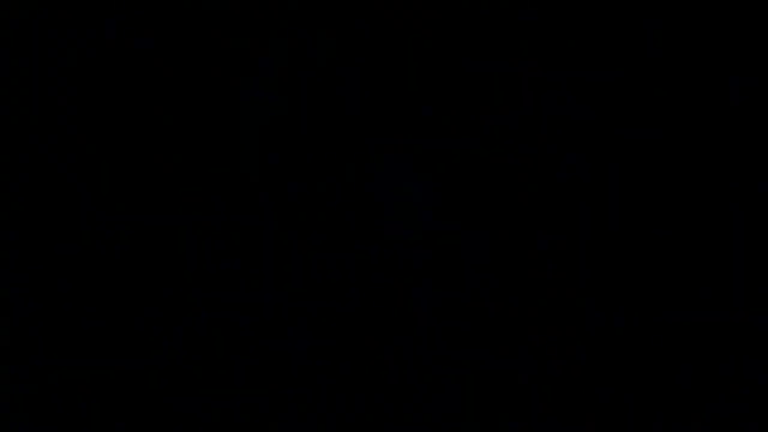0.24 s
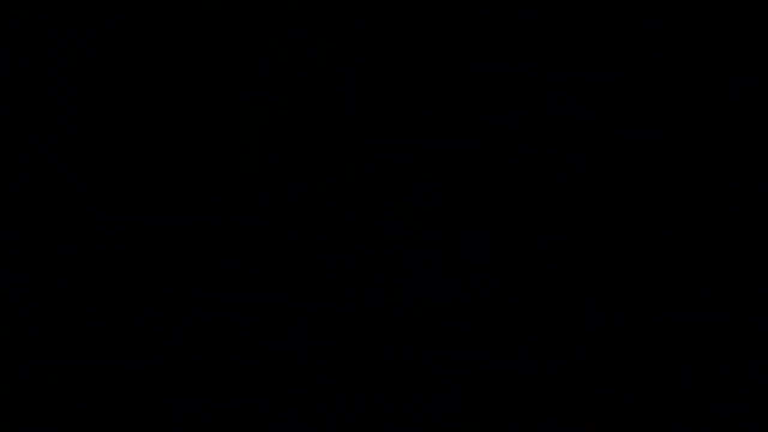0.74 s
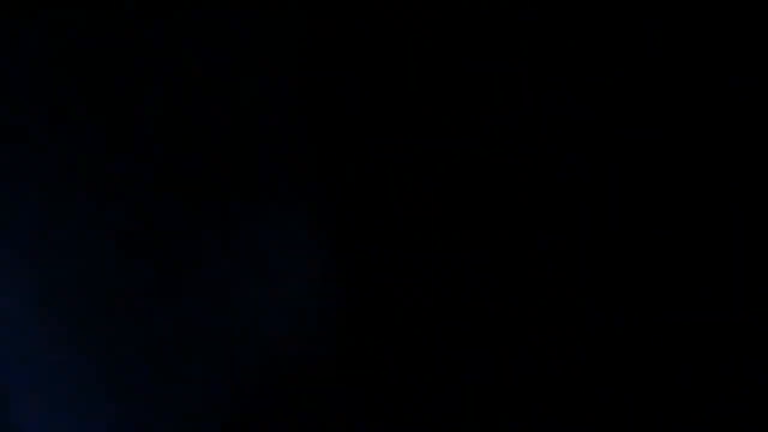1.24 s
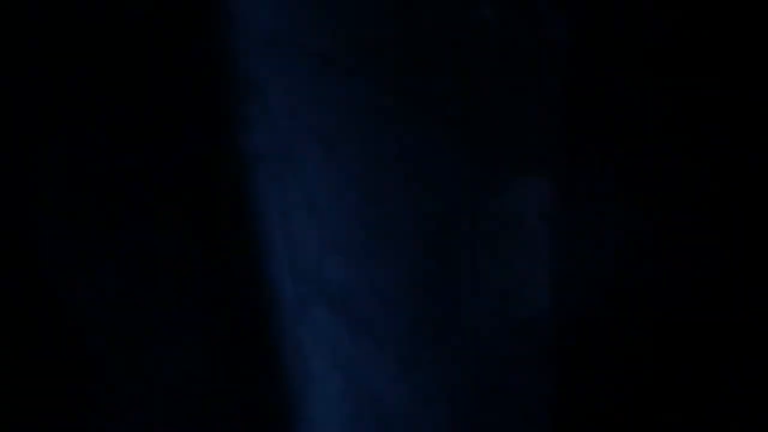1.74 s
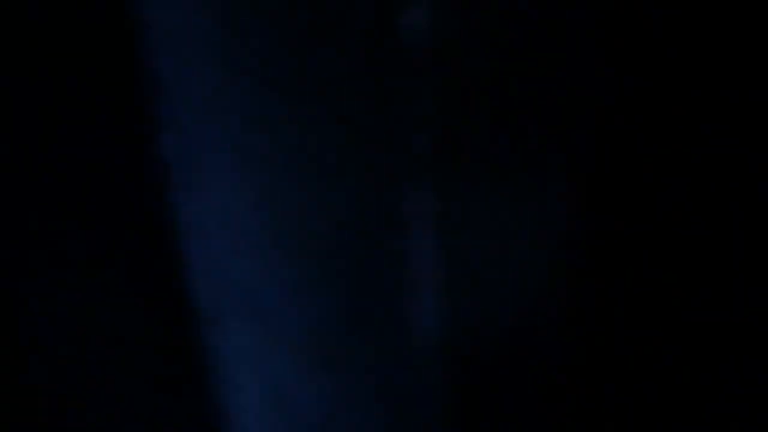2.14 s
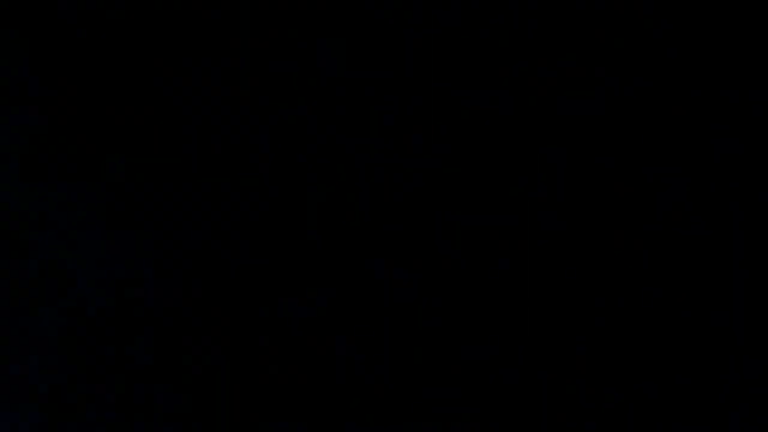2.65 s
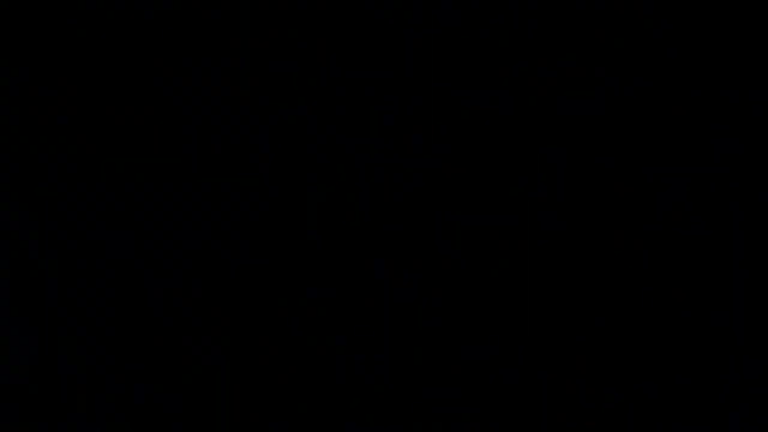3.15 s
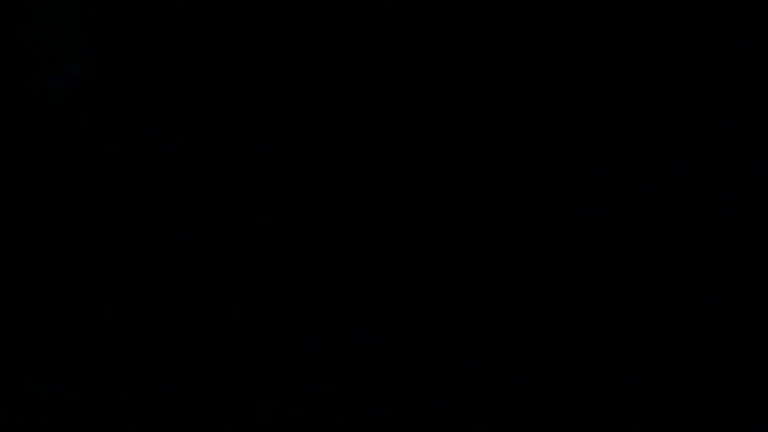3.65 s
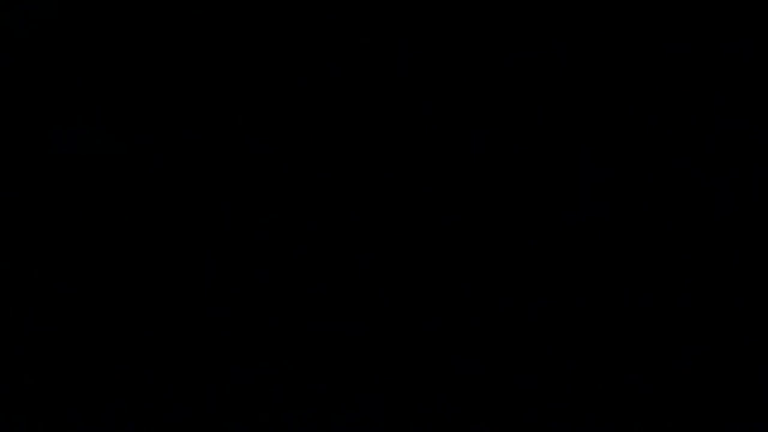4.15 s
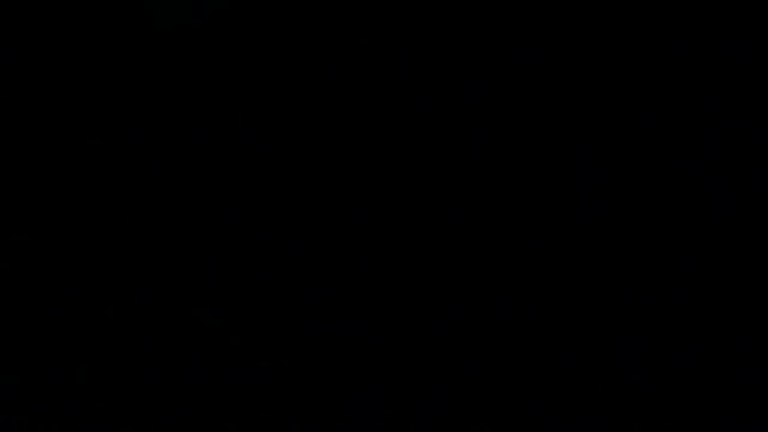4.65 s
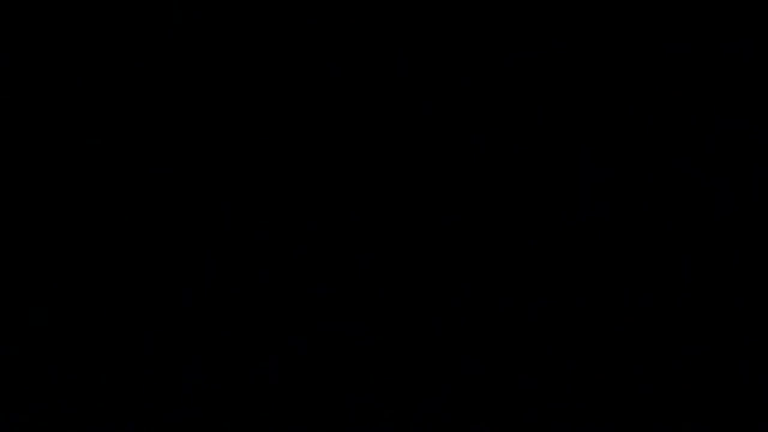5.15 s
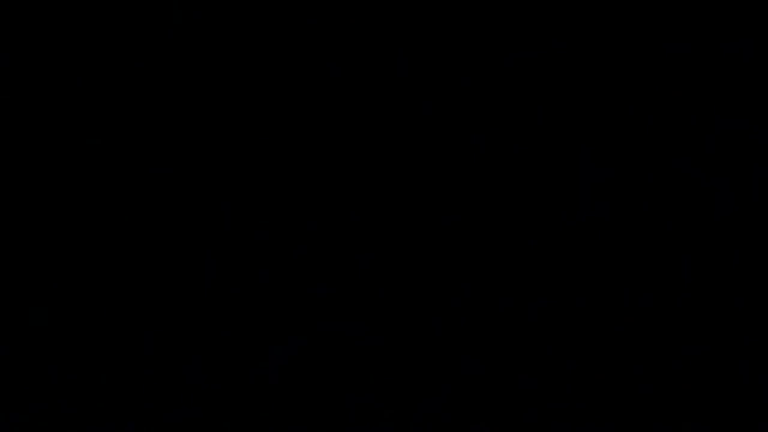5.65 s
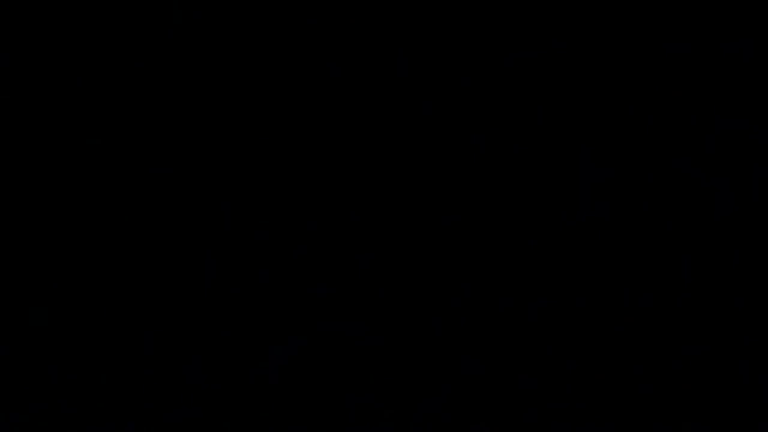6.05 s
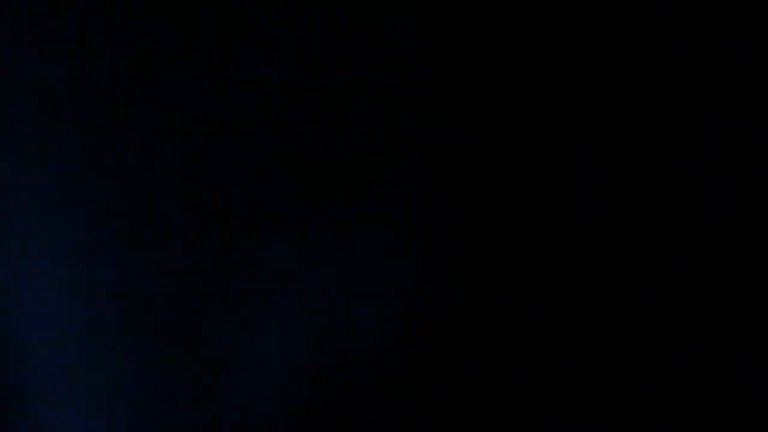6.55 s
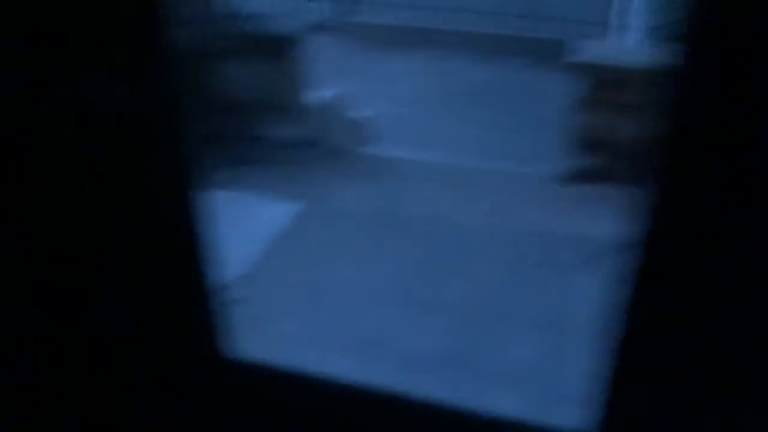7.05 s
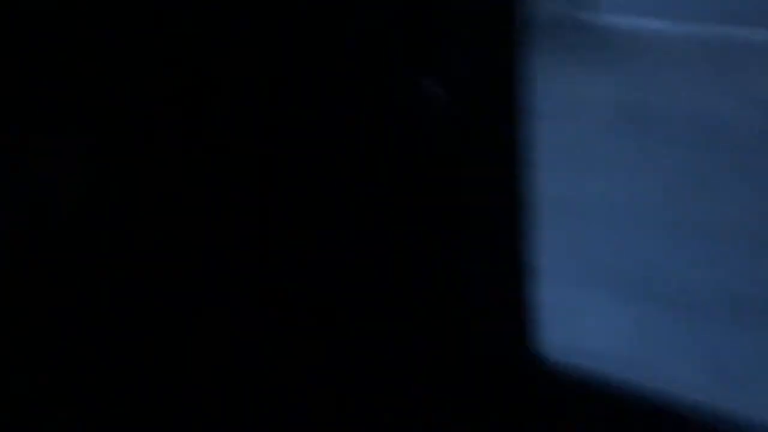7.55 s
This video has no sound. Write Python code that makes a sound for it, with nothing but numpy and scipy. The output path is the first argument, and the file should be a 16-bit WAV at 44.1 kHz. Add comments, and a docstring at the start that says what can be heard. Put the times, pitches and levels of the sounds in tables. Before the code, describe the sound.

Door and lock knocks in an echoing hall, then a bunch of metal keys jingles and clinks close by, with hard clacks and handling bumps.

```python
"""Keys and a door in an echoing hall

A bunch of keys is shaken and sorted in a hard entrance hall while a door is unlocked and opened.
Keys are ticks of noise and decaying modes; door and lock are struck, scraped and ringing resonances.
Sleeves rustle as uneven noise, bare walls answer, and a quiet background with a wavering hum runs throughout.
Near the end, fingers bump the microphone's housing as quick falling tones."""
import sys
import numpy as np
from scipy import signal
from scipy.fft import rfft, irfft
from scipy.io import wavfile
from scipy.ndimage import uniform_filter1d

SR = 44100
rng = np.random.default_rng(int(sys.argv[2]) if len(sys.argv) > 2 else 0)


def to_wav(sig):
    """Store sig (one row per channel, or 1-D mono) as 16-bit WAV at the path in sys.argv[1].

    Samples outside -1..1 are clipped; the rate is SR.
    """
    pcm = np.clip(np.atleast_2d(sig), -1, 1) * 32767
    pcm = np.round(pcm).astype(np.int16)
    wavfile.write(sys.argv[1], SR, pcm.T)  # frames by channels


N = 343980
TOP_HZ = 15850  # upper limit of the recorder
ORDINARY_DB = -30  # an ordinary strike or shake of the keys

# spectrum of cloth and skin: (pitch_hz [Hz], level_db [dB])
CLOTH_COLOUR = [(30, -5.5), (60, -3), (140, -3), (300, 3.5), (700, 0.5), (1500, -5), (2600, -7.5),
                (4500, -17.5), (9000, -22), (16000, -24)]


def undb(db):
    """Decibels to gain."""
    return 10 ** (np.asarray(db) / 20)


def seconds(length):
    """Time axis of a short sound."""
    return np.arange(int(length * SR)) / SR


def add(track, start, sound):
    """Mix a sound into a track at a time in seconds."""
    i = int(np.clip(start * SR, 0, len(track)))
    track[i:i + len(sound)] += sound[:len(track) - i]


def unit(x):
    """Scale to rms 1."""
    return x / np.sqrt(np.mean(x ** 2))


def crest(x):
    """Scale so that the loudest 5 ms have rms 1."""
    return x / np.sqrt(uniform_filter1d(x ** 2, size=220, mode="constant").max())


def along(hz, points):
    """Read (Hz, value) points on a log-frequency axis."""
    f, value = np.transpose(points)
    return np.interp(np.log(np.maximum(hz, 1)), np.log(f), value)


def colour(x, points):
    """Give a sound the spectrum of (Hz, dB) points."""
    gain = undb(along(np.fft.rfftfreq(len(x), 1 / SR), points))
    return irfft(rfft(x) * gain, len(x))


def band(x, lo, hi):
    """Causal band-pass."""
    return signal.sosfilt(signal.butter(2, [lo, hi], "bandpass", fs=SR, output="sos"), x)


def air(waver_hz=7, waver=1.0):
    """Quiet background noise, with low hum tones whose strength wavers at random."""
    # spectrum of the background: (pitch_hz [Hz], level_db [dB, relative])
    air_colour = [(15, -41), (25, -4), (123, -2.5), (190, -4), (363, -5), (887, -15), (1020, -15.5),
                  (1520, -18.5), (3820, -17), (7920, -23.5), (10400, -20), (16000, -29.5)]
    # hum tones: (pitch_hz [Hz], level_db [dB, mean amplitude])
    hum = [(119, -65), (242.2, -71), (333.8, -74)]
    air_db = -62.5  # rms
    out = undb(air_db) * unit(colour(rng.standard_normal(N), air_colour))
    slow = signal.butter(2, waver_hz, fs=SR, output="sos")
    for hz, db in hum:
        drift = unit(signal.sosfilt(slow, rng.standard_normal(N)))
        tone = np.sin(2 * np.pi * hz * np.arange(N) / SR)
        out = out + undb(db) * (1 + waver * drift) * tone
    return out


def friction(length, grain_db, grain_s):
    """Noise of two surfaces that catch and slip unevenly."""
    grip, noise = rng.standard_normal((2, max(length, SR)))
    grip = unit(uniform_filter1d(grip, max(int(grain_s * SR), 1)))
    return (noise * undb(grain_db * grip))[:length]


def scrapes(spread=2.49):
    """Short strokes of friction that swell and fade."""
    # scrapes and rubs of key, door, sleeves and hand:
    # (start_s [s], end_s [s], level_db [dB rms before the swell], centre_hz [Hz])
    strokes = [(0.0, 0.143, -59, 543), (0.513, 0.56, -41.5, 1170), (0.842, 1.006, -47, 229),
               (2.577, 2.757, -51.5, 6100), (3.323, 3.495, -58, 3680), (6.41, 6.502, -40.5, 230),
               (4.269, 4.558, -48.5, 61.6), (4.768, 4.838, -37, 1700), (4.807, 4.887, -38, 79.7),
               (5.195, 5.29, -39, 1397), (5.851, 5.908, -43, 1530), (6.4, 6.65, -40, 594),
               (6.814, 7.014, -55, 5550), (7.102, 7.483, -61, 3340), (7.599, 7.738, -53.5, 416),
               (7.729, 7.826, -53, 1110)]
    out = np.zeros(N)
    for start, end, db, hz in strokes:
        swell = np.sin(np.linspace(0, np.pi, len(seconds(max(end - start, .01)))))
        rub = friction(len(swell), grain_db=5.5, grain_s=.006)
        stroke = band(rub, hz / spread, min(hz * spread, SR / 2 - 1))
        add(out, start, undb(db) * unit(stroke) * swell)
    return out


def hall(x, wet_db, gap_s=0.00082, build_s=0.0052):
    """Diffuse echoes of bare walls, dying sooner in the high treble, with a few standing waves."""
    # decay of the echoes: (pitch_hz [Hz], t60_s [s])
    hall_t60 = [(100, 0.62), (300, 0.71), (800, 0.93), (2000, 0.5), (5000, 0.47), (14000, 0.27)]
    # standing waves: (pitch_hz [Hz], level_db [dB before build-up and wet level], t60_s [s])
    hall_modes = [(124.1, -61, 0.89), (173.1, -55.5, 1.33), (256, -72, 0.58), (533.5, -61.5, 1),
                  (404, -57, 1.1)]
    t = seconds(1.5)
    edges = np.geomspace(30, 17000, 12)
    tail = np.zeros(len(t))
    for lo, hi in zip(edges, edges[1:]):
        t60 = along(np.sqrt(lo * hi), hall_t60)
        tail += band(rng.standard_normal(len(t)), lo, hi) * undb(-60 * t / t60)
    tail = tail / np.sqrt(np.sum(tail ** 2))
    waves = np.zeros(len(t))
    for hz, db, t60 in hall_modes:
        waves += undb(db - 60 * t / t60) * np.sin(2 * np.pi * (hz * t + rng.random()))
    build_up = 1 - np.exp(-np.maximum(t - gap_s, 0) / build_s)
    return undb(wet_db) * signal.fftconvolve(x, (tail + waves) * build_up)[:N]


def door_body(x):
    """Colour a sound with the broad response and the resonances of door and lock."""
    # broad response: (pitch_hz [Hz], level_db [dB])
    knock_colour = [(30, 10), (60, 6), (130, 1), (300, 2), (1200, -3), (2200, -6), (4000, -12.5),
                    (7000, -19), (16000, -24)]
    # resonances: (centre_hz [Hz], width_hz [Hz], lift_db [dB])
    door_modes = [(128, 41.7, 5.5), (531, 39, 8.5), (794, 46, 3), (1150, 320, 0), (2846, 430, 4)]
    hz = np.fft.rfftfreq(len(x), 1 / SR)
    lift_db = sum(db / (1 + (2 * (hz - centre) / width) ** 2) for centre, width, db in door_modes)
    return irfft(rfft(colour(x, knock_colour)) * undb(lift_db), len(x))


def knocks(trim_db=(-4, -2, -10, -1), t60=(.12, .08, .065, .035), rise_s=0.0012, light_hz=135, heavy_hz=45):
    """Blows on door and lock: noise stands for densely packed modes, the low ones lasting longest."""
    # knocks of door, latch and lock, levels before the band trims: (start_s [s], strength_db [dB],
    # weight_db [dB, bass re strength], hardness_db [dB, treble re strength])
    blows = [(0.248, -20, -15, -9), (0.259, -15.5, -11, -10), (0.266, -13.5, -7, -24.5),
             (0.341, -18, -21, -9.5), (0.363, -19, -10, -36), (0.526, -20, -12.5, -27),
             (0.627, -16.5, -17, -13.5), (0.644, -21.5, -8, -18), (3.65, -28.5, -21, -21.5),
             (3.672, -30, -20.5, -17), (3.76, -31, -14.5, -13), (3.93, -32.5, -12, -18),
             (4.102, -17.5, -18, -20.5), (4.208, -41, -10, -9), (4.272, -28.5, -13, -16.5),
             (4.42, -29, -20.5, -14.5), (4.474, -35.5, -22, -18), (4.552, -33, -39, -17.5),
             (4.6, -33, -18.5, -17), (4.732, -30.5, -19, -18), (5.041, -27.5, -15, -20),
             (4.824, -17.5, -20.5, -7.5), (5.218, -25, -19, -19), (5.245, -12, -16.5, -13.5),
             (5.432, -17.5, -16.5, -7), (5.864, -22.5, -11.5, -19), (5.948, -35.5, -6.5, -1.5),
             (5.97, -28, -6, -15.5), (6.032, -18.5, -12, -16), (6.045, -15, -18, -16),
             (6.224, -29.5, -16, -9.5), (6.257, -33.5, -21, -8), (6.282, -30, -11, -20),
             (6.361, -23.5, -15.5, -17), (6.396, -32, -23, -14), (6.414, -32.5, 4.5, -6.5),
             (6.512, -29, -1, -14), (6.591, -32, -4, -9.5), (7.736, -25.5, -8, -27)]
    # edges between bass, low mids and mids [Hz]
    inner_edges_hz = [300, 900]
    # the low mids follow the weight: dB re strength at a weight of 0 dB, dB per dB of weight
    low_mid_db, low_mid_growth = -7, 0.53
    out, t = np.zeros(N), seconds(0.33)
    for start, strength_db, bass, treble in blows:
        shiver = door_body(rng.standard_normal(len(t))) * (1 - np.exp(-t / rise_s))
        low_mid = low_mid_db + low_mid_growth * bass
        levels = strength_db + np.array([bass, low_mid, 0, treble]) + trim_db
        # only a heavy blow moves the whole door and reaches its lowest modes
        lowest = np.interp(bass, [-19, -11], [light_hz, heavy_hz])
        # a soft contact lasts longer, so the mids end lower
        brightest = np.interp(treble, [-24, -14], [1800, 2600])
        edges = [lowest, *inner_edges_hz, brightest, TOP_HZ]
        for lo, hi, db, ring in zip(edges, edges[1:], levels, t60):
            fading = shiver * undb(-60 * t / ring)
            add(out, start, undb(db) * crest(band(band(fading, lo, hi), lo, hi)))
    return out


def rings(events, low_t60, high_t60):
    """Single notes that die away, with decay times in s set at 120 Hz and 3 kHz."""
    out, t = np.zeros(N), seconds(.5)
    for start, db, hz in events:
        t60 = along(hz, [(120, low_t60), (3000, high_t60)])
        add(out, start, undb(db - 60 * t / t60) * np.sin(2 * np.pi * hz * t))
    return out


def bounces(t, gap_s=0.0042, loss_db=3.5, count=4):
    """A contact and a few rebounds at uneven gaps, of random size and sign under a falling limit."""
    hits = np.zeros(len(t))
    hits[0] = 1
    for k, delay in enumerate(np.cumsum(rng.exponential(gap_s, count))):
        add(hits, delay, undb([-loss_db * (k + 1)]) * rng.uniform(-1, 1))
    return hits


def clink(group_db, t60, note_hz, note_db=7, scatter_db=5, detune=0.0034, stray_db=-12,
          dense_db=(-5, -8, -11, -6), dense_t60=0.023, count=8):
    """One key strike: each group of modes rings over the many quickly damped modes of keys lying together."""
    # modes of the keys on the ring: (pitch_hz [Hz], level_db [dB, relative])
    key_modes = [(2110, -14.5), (2430, -7), (2620, -5), (3240, -18), (5560, -9.5), (5940, -5.5),
                 (6300, -6.5), (6895, 0.5), (7290, -5), (8340, -8.5), (10060, -11.5), (10380, -10),
                 (10560, -1.5), (10615, 9), (12240, -29.5), (12512, -1), (13440, 4), (13975, 7), (14300, 5),
                 (15400, -21.5)]
    # edges of the four groups of modes [Hz]
    group_edges_hz = [2000, 9500, 11700, 13100, 16000]
    t = seconds(.1)
    # besides the shared modes, the struck key has its own note and its neighbours add a few stray ones
    strays = [(hz, stray_db) for hz in rng.uniform(5000, 15500, count)]
    hz, db = np.transpose(key_modes + strays + [(note_hz, note_db)])
    size, shift, phase, grip = rng.standard_normal((4, len(hz)))
    # the point of contact weights the modes; the pressure of neighbours shifts and damps them
    damping = np.log(1000) / t60 * np.exp(0.1 * grip)
    poles = 2j * np.pi * hz * (1 + detune * shift) - damping
    weights = undb(db + scatter_db * size) * np.exp(1j * np.pi * phase)
    hits, out = bounces(t), 0
    for lo, hi, level_db, dense in zip(group_edges_hz, group_edges_hz[1:], group_db, dense_db):
        own = (hz >= lo) & (hz < hi)
        ring = (weights[own] @ np.exp(poles[own, None] * t)).imag
        noise = rng.standard_normal(len(t))
        clash = band(band(noise, lo, hi), lo, hi) * undb(-60 * t / dense_t60)
        contact = crest(ring) + undb(dense) * crest(clash)
        out = out + undb(level_db) * crest(signal.fftconvolve(contact, hits)[:len(t)])
    return out


def strike_levels(lean_db, body_db, sparkle_db):
    """Levels of the four groups of modes in a strike; the two middle groups share its strength."""
    pair = undb([-lean_db / 2, lean_db / 2])
    pair_db = 20 * np.log10(pair / np.hypot(*pair))
    return np.array([body_db, *pair_db, sparkle_db])


def keys(trim_db=(-1.5, -.7, -.7, -1.5), ring_t60=0.04, freedom=0.073, tick_t60=0.0069):
    """The clear strikes: a hard tick of metal on metal, then the ring of whichever keys hang free."""
    # hard ticks of edge on edge, mostly where keys are held fast; the one at 0.9 s is a metal ring of the door:
    # (start_s [s], peak_db [dB])
    hard_ticks = [(0.616, -33), (0.9, -28), (1.114, -35), (1.446, -35), (1.571, -17.5), (1.715, -31),
                  (3.181, -32.5), (4.102, -17), (4.407, -20.5), (6.042, -5), (7.624, -29)]
    # clear strikes in the bunch, levels before the group trims: (start_s [s], strength_db [dB],
    # lean_db [dB: + rings the key at 12.5 kHz, - the key at 10.6 kHz], body_db [dB, low modes re strength],
    # sparkle_db [dB, topmost modes re strength], note_hz [Hz, own note of the struck key])
    strikes = [(1.144, -42, -3, -4.5, -14, 5700), (1.191, -38.5, 9, -4, -11, 6500),
               (1.261, -30.5, -6, -5, -8, 10360), (1.541, -43.5, -6, -0.5, -13, 6900),
               (1.568, -38.5, -8, -3.5, -8, 7030), (1.763, -50, -5, 8.5, -2, 7080),
               (2.014, -43, -11, -10.5, -28, 7400), (2.134, -41.5, -4, -10, -10, 13490),
               (2.164, -35, -27, -17, -26, 5940), (2.208, -39, 9, -14, -27, 13460),
               (2.265, -42, -21, -10, -4, 13480), (2.301, -34, -18, -5.5, -10, 10250),
               (2.397, -50, -1, 8.5, 2, 14000), (2.554, -35, -16, -24, 2, 6600),
               (2.589, -32, -4, -24, -11, 13390), (2.622, -25.5, 4, -26, -8, 13600),
               (2.634, -30, 5, -24, -20, 13440), (2.679, -18.5, 8, -10.5, -1, 14200),
               (2.872, -27, 2, -13, -6, 14300), (2.912, -36.5, 9, -3.5, -8, 6100),
               (3.006, -40.5, 5, -2, -10, 6040), (3.269, -39.5, 5, -4.5, -14, 6100),
               (3.34, -30.5, -8, -13, -17, 14100), (3.352, -29, -3, -9, -7, 14100),
               (3.361, -29.5, 5, -7, -1, 14000), (3.406, -21.5, -19, -14.5, -11, 13500),
               (3.454, -33.5, -16, -17, -18, 9900), (3.518, -31, 3, -18, -6, 13300),
               (3.65, -43, -19, 0, -7, 6980), (3.93, -41, -1, -4.5, 5, 14400),
               (4.069, -43.5, -4, -5.5, -13, 12720), (4.102, -30, -8, -7, 0, 5700),
               (4.215, -43, 5, 2.5, 2, 6260), (4.323, -29, -2, -11.5, -14, 5900),
               (4.473, -38.5, -1, -4, -9, 6700), (4.587, -41, -7, -11, -17, 6940),
               (4.621, -32, 9, -11, -21, 11700), (4.633, -18, 8, -20.5, -16, 12900),
               (4.683, -32.5, -21.5, -8, -23, 10400), (4.736, -32.5, 1, -26, -11, 13300),
               (4.764, -26, -10, -19, -10, 10280), (4.873, -29.5, 6, -22, -18, 12800),
               (4.971, -27.5, 1, -16, -7, 10370), (5.013, -33.5, -4, -1, -3, 14100),
               (5.088, -28.5, -8, -9, -11, 12730), (5.102, -28, 0, -9, -20, 12800),
               (5.152, -26.5, 8.5, -8, -11, 13900), (5.376, -10, 7, -25, -28, 13440),
               (5.752, -34.5, 0, -3.5, -21, 7330), (5.859, -25.5, -26, -12, -10, 9920),
               (6.038, -18, -4.5, -8, -17, 10240), (6.076, -22.5, 3, -0.5, -2, 7150),
               (6.109, -10.5, -6, -17.5, -23, 14030), (6.325, -44, -6, 4, -3, 6260),
               (6.358, -30.5, -5, 1, -7, 6770), (6.829, -46, -3, -4, -4, 6140),
               (6.865, -52, -5, 4, -5, 13900), (6.919, -41, -10, -5, -3, 10270)]
    # tick of an ordinary strike in dB, and its growth in dB per dB of strength
    tick_db, tick_growth = -28, 0.81
    out, t = np.zeros(N), seconds(.02)
    strike_ticks = [(s, tick_db + tick_growth * (db - ORDINARY_DB)) for s, db, *_ in strikes]
    for start, peak_db in hard_ticks + strike_ticks:
        tick = band(rng.standard_normal(len(t)) * undb(-60 * t / tick_t60), 6300, 17300)
        add(out, start, undb(peak_db) * tick / np.abs(tick).max())
    for start, strength_db, lean_db, body_db, sparkle_db, note_hz in strikes:
        # a hard strike throws the key clear, so it rings longer
        t60 = ring_t60 * undb(freedom * (strength_db - ORDINARY_DB))
        group_db = strength_db + strike_levels(lean_db, body_db, sparkle_db) + trim_db
        add(out, start, clink(group_db, t60, note_hz))
    return out


def jingle(group_db=(-7, -4, -5, -7), t60=0.057, spread_db=4, level_db=-5, slide_db=-3, count=24):
    """Moving keys touch lightly at uneven times, and toothed edges sliding along each other shimmer."""
    # spells in which the keys slide over each other:
    # (start_s [s], end_s [s], level_db [dB before the contact and slide trims])
    shakes = [(1.154, 1.443, -48.5), (1.55, 1.616, -32), (1.638, 1.88, -51), (2.203, 2.515, -46),
              (2.521, 2.773, -26.5), (2.776, 3.129, -45), (3.329, 3.539, -36.5), (4.203, 4.403, -37),
              (5.083, 5.245, -41), (5.935, 6.192, -36), (6.207, 6.544, -47.5), (6.831, 7.031, -42)]
    # contacts per s in an ordinary spell, and dB of rate per dB of level: a livelier shake brings more
    contacts_per_s, contact_growth = 140, 0.33
    out = np.zeros(N)
    voices = []
    for _ in range(count):
        voice_db = np.array(group_db) + spread_db * rng.standard_normal(4)
        voices.append(clink(voice_db, t60, rng.uniform(5500, 14500)))
    for start, end, db in shakes:
        span = max(end - start, .02)
        rate = contacts_per_s * undb(contact_growth * (db - ORDINARY_DB))
        # at most 64 contacts in a spell
        for place, size, voice in rng.random((64, 3))[:int(span * rate)]:
            swing = np.sin(np.pi * place) ** .5
            contact_db = db + level_db + 0.89 * spread_db * (size - 2.5)
            add(out, start + place * span, swing * undb(contact_db) * voices[int(voice * count)])
        swell = np.sin(np.linspace(0, np.pi, len(seconds(span))))
        touching = sum(voices[k] for k in rng.choice(count, size=8))  # keys drawn afresh in every spell
        rub = friction(len(swell), grain_db=12.5, grain_s=0.0036) * swell
        add(out, start, undb(db + slide_db) * crest(signal.fftconvolve(rub, touching)))
    return out


def rustle(trim_db=-5):
    """Cloth and soles shift in soft scuffs: uneven friction noise that swells and fades."""
    # sleeves and shuffling at the door: (start_s [s], level_db [dB before the trim])
    scuff_levels = [(3.6, -79.5), (4.23, -44.5), (6.54, -51.5), (6.74, -51), (7.5, -63)]
    s, db = np.transpose(scuff_levels)
    scuffs = unit(colour(friction(N, grain_db=1.5, grain_s=0.0085), CLOTH_COLOUR))
    return scuffs * undb(trim_db + np.interp(np.arange(N) / SR, s, db, left=-120))


def bumps(rise_s=0.0024, glide_s=0.0026, end_hz=230, skin_db=-19):
    """A tap on the housing arrives as a bending wave, its highs first, with a rub of skin."""
    # fingers on the microphone's housing: (start_s [s], level_db [dB], pitch_hz [Hz, at the start])
    taps = [(7.0711, -21, 1330), (7.0849, -23, 607), (7.325, -39.5, 1080), (7.643, -35.5, 806),
            (7.669, -35.5, 1030)]
    out, t = np.zeros(N), seconds(0.046)
    swell = t / rise_s * np.exp(1 - t / rise_s)
    for start, db, hz in taps:
        pitch = end_hz + (hz - end_hz) * np.exp(-t / glide_s)
        wave = np.sin(2 * np.pi * np.cumsum(pitch) / SR)
        skin = unit(colour(rng.standard_normal(len(t)), CLOTH_COLOUR))
        add(out, start, undb(db) * swell * (wave + undb(skin_db) * skin))
    return out


def scene():
    """Keys close to the microphone, the door a step away with more echo, all in the same hall."""
    # blows that ring one part of the door, from leaf to latch: (start_s [s], level_db [dB], pitch_hz [Hz])
    door_rings = [(0.264, -22.5, 123), (0.344, -20, 1070), (0.641, -26, 114.4), (3.651, -30, 3080),
                  (3.762, -34, 3035)]
    # keys that swing clear and ring on at one note: (start_s [s], level_db [dB], pitch_hz [Hz])
    free_rings = [(2.53, -34, 14000), (2.555, -34.5, 6870), (2.611, -24, 13440), (2.726, -36, 6800),
                  (2.811, -30.5, 12240), (3.015, -37.5, 6290), (5.859, -30, 10130), (6.829, -43.5, 6010)]
    door = scrapes() + knocks() + rings(door_rings, low_t60=0.16, high_t60=0.025)
    metal = keys() + jingle() + rings(free_rings, low_t60=.5, high_t60=0.088)
    echoes = hall(metal, wet_db=-8) + hall(door, wet_db=-3.5)
    return (metal + door + echoes + rustle() + bumps() + air())[None]


def record(dry):
    """The recorder cuts the top with a steep low-pass."""
    return signal.sosfilt(signal.ellip(8, .2, 70, TOP_HZ, fs=SR, output="sos"), dry)


dry = scene()
out = record(dry)
to_wav(out)
```